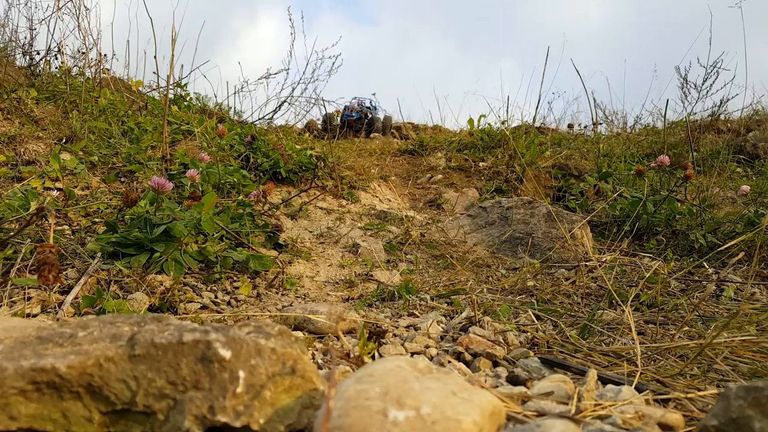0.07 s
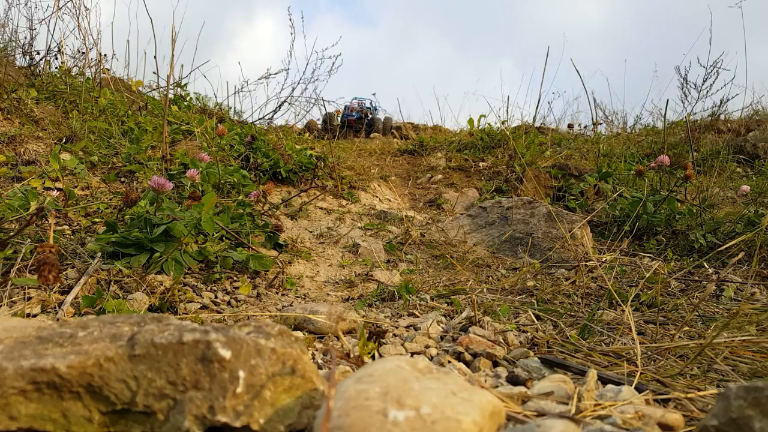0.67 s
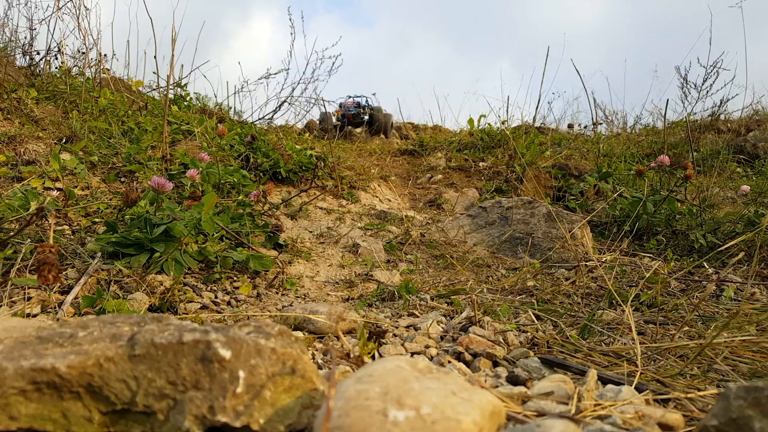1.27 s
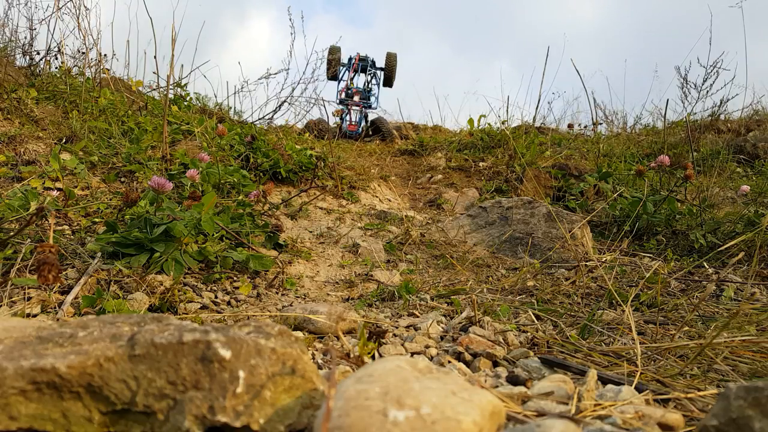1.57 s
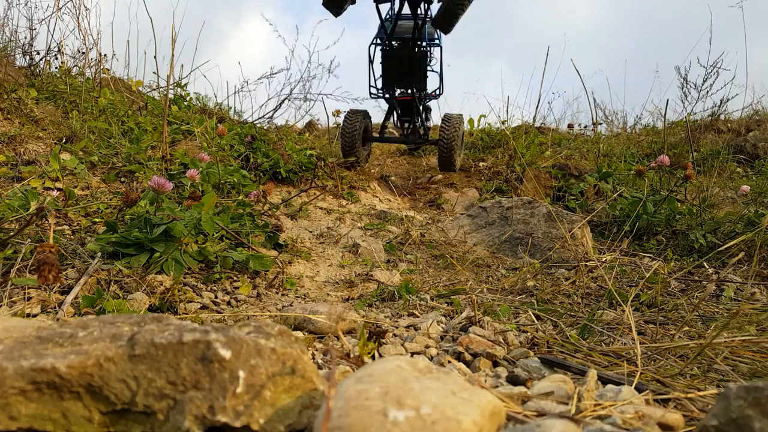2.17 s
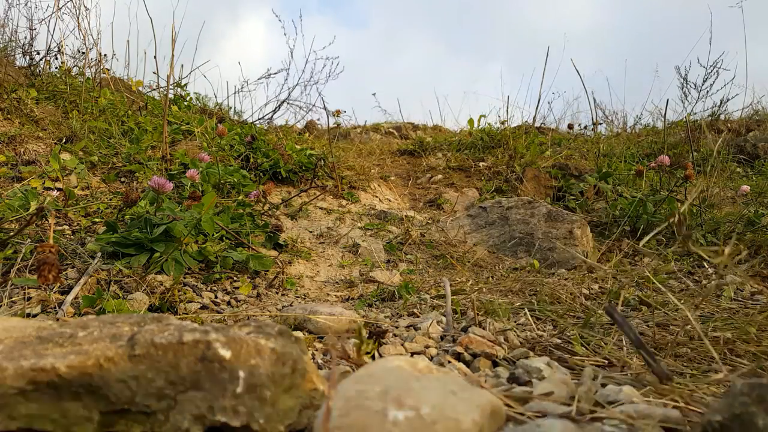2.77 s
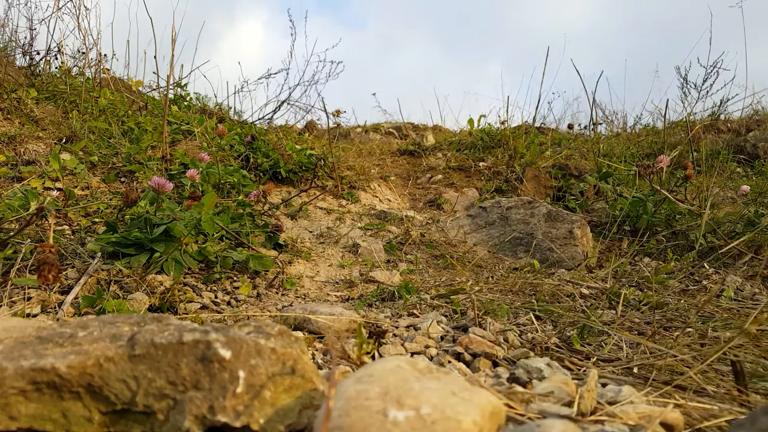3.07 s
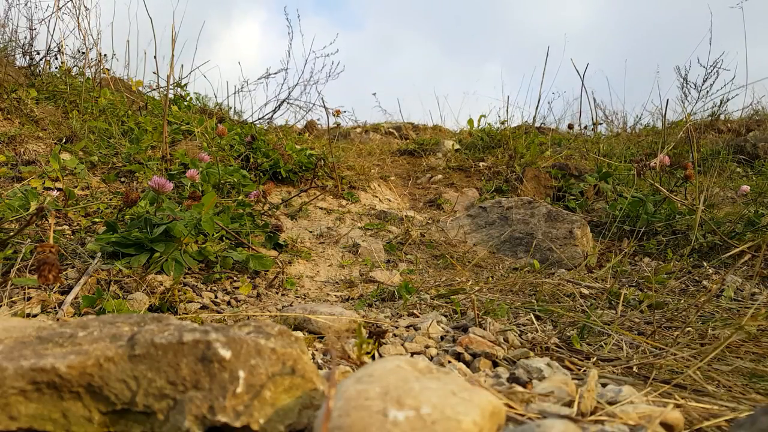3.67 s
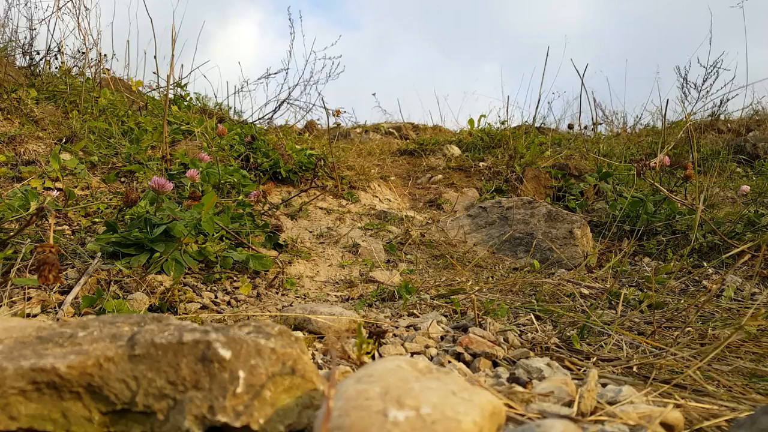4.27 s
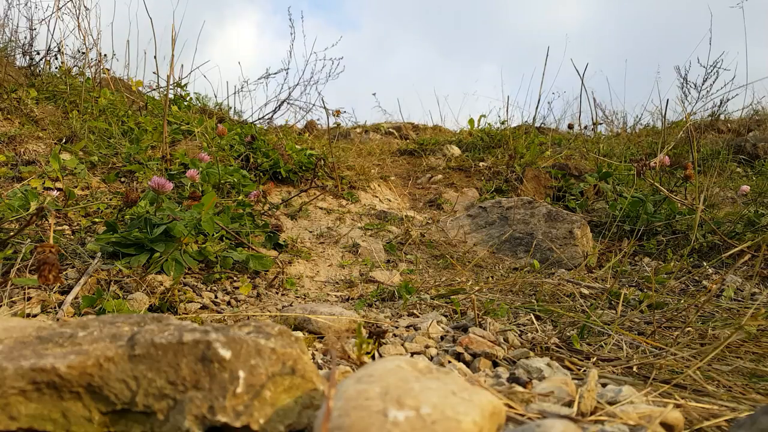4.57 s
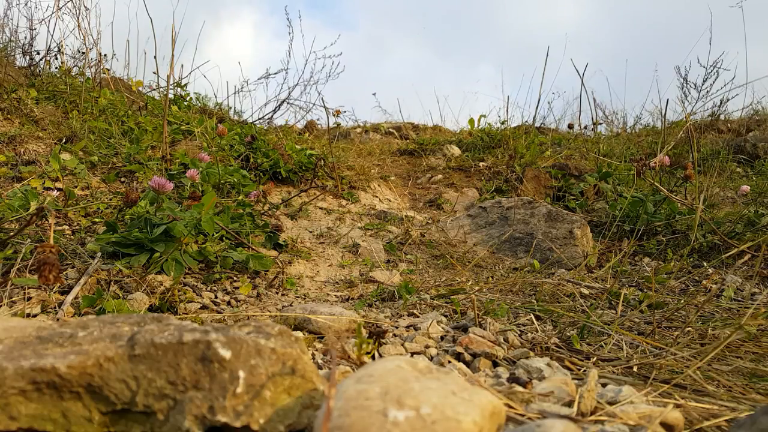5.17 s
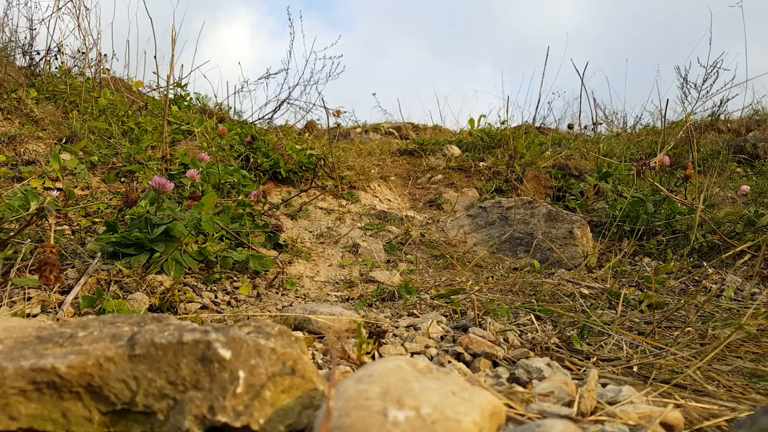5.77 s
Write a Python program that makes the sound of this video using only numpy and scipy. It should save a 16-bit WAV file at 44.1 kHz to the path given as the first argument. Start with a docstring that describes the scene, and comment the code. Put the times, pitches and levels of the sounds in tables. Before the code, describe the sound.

A radio-controlled car revs briefly, then tumbles down a gravelly bank with thumps, plastic clacks and scrapes, crashing close on the right.

```python
"""A far engine drones and grasshoppers rasp at the foot of a grassy bank; a distant bird peeps.
Up on the crest a radio-controlled car revs, gears whining and brushes hissing, then tumbles down
through gravel and dry straw. It passes just right of a stereo microphone on the ground and crashes
beside it, tyres thumping and plastic body clacking, with a hollow boom. Stalks and pebbles settle."""
import sys
import numpy as np
from scipy import signal
from scipy.fft import rfft, irfft, next_fast_len
from scipy.io import wavfile
from scipy.ndimage import uniform_filter1d, map_coordinates

SR = 44100
rng = np.random.default_rng(int(sys.argv[2]) if len(sys.argv) > 2 else 0)


def transcribe(signal):
    """Save signal, clipped to [-1, 1], as a 16-bit WAV file at the path in sys.argv[1]."""
    frames = np.atleast_2d(signal).T
    limited = np.clip(frames, -1, 1)
    pcm = np.round(limited * 32767).astype(np.int16)
    wavfile.write(sys.argv[1], SR, pcm)


N = 257103

# Levels in the tables are relative within each layer.
# spectra of the open air, far insects and a grasshopper's rasp: frequency_hz, gain_db
AIR_SPECTRUM = [(20, -23), (35, -3), (52, 2), (74, -3), (100, 4), (160, -1.5), (300, -8), (500, -15.5),
                (1000, -22), (2000, -31.5), (4000, -45), (7000, -48.5), (9000, -52.5), (16000, -45)]
INSECT_SPECTRUM = [(3800, -44), (4600, -19), (4850, -0.5), (5100, -31), (6000, -42), (8200, -8),
                   (9100, 1.5), (9900, -21), (12000, -45)]
RASP_SPECTRUM = [(6000, -62), (7500, -1), (8300, 14.5), (8800, 10.5), (9100, -6), (9600, 11), (10500, -61),
                 (14000, -38)]
# a deep hum: frequency_hz, gain_db; its swell: time_s, level_db
HUM_SPECTRUM = [(45, -54.5), (62, -4.0), (72, 9), (82, -1.5), (110, -41.5), (400, -101)]
HUM_SWELL = [(0, -49.5), (1.2, -44), (2.7, -44.5), (4, -54), (5.83, -48)]
# the far engine fading away: time_s, level_db
ENGINE_FADE = [(0, -39), (.44, -29.5), (.56, -42), (1.3, -41.5), (1.45, -52), (1.9, -49.5), (2.2, -87)]
# peeps of a far bird: start_s, level_db
BIRD_PEEPS = [(0.41, -72), (0.601, -75), (0.87, -74)]
# bouts of grasshopper song: start_s, length_s, level_db
SONG_BOUTS = [(0, 0.26, -55.5), (2.604, 6.9, -58.5), (5.08, 0.82, -60.5)]
# the waiting electronics' whistle: time_s, level_db
WHISTLE_FADE = [(0, -73), (.55, -73), (.8, -69), (.87, -85), (1, -120)]
# throttle squeezes: at_speed_s, length_s, mesh_hz, whine_db, hiss_db
THROTTLE_SQUEEZES = [(0.964, 0.013, 470, -40, -61), (1.138, 0.034, 1025, -44, -52),
                     (1.213, 0.056, 1180, -40, -51), (1.31, 0.009, 1125, -39, -47),
                     (1.425, 0.017, 440, -43, -66), (1.49, 0.02, 800, -54, -65),
                     (1.54, 0.06, 720, -62, -70)]
# gear overtones: mesh_multiple, level_db
GEAR_OVERTONES = [(1, -4.5), (2, 3.5), (3, -10.5), (4, -4.5), (6, -16), (8, -17)]
# what gearbox and brushes radiate: frequency_hz, gain_db
GEARBOX_RESPONSE = [(400, -8.5), (950, 1.5), (1250, -2.5), (1600, 2), (2000, -17), (2350, -6), (3200, 2.5),
                    (4200, -21), (6300, 4.5), (8500, -4)]
BRUSH_SPECTRUM = [(3000, -14), (6000, -11), (7500, 3), (8600, 10), (10000, -3.5), (16000, -27)]
# the car drags or loose ground slides: start_s, length_s, soil_db, gravel_db, straw_db
GROUND_DRAGS = [(0.06, 0.091, -43.5, -51, -64.5), (0.955, 0.052, -51, -51.5, -64),
                (1.13, 0.032, -37.5, -37.5, -57), (1.24, 0.097, -40.5, -42, -44.5),
                (1.44, 0.068, -35.5, -39.5, -54), (1.58, 0.078, -50.5, -50, -62),
                (1.765, 0.0086, -45, -37.5, -43), (1.92, 0.0094, -39, -29, -38.5),
                (1.98, 0.044, -41, -40.5, -48.5), (2.383, 0.0069, -33.5, -29, -63),
                (2.427, 0.012, -28, -23, -27), (2.49, 0.01, -37, -36.5, -47),
                (2.62, 0.07, -65, -52.5, -50.5), (2.768, 0.044, -25, -23.5, -27.5),
                (2.805, 0.015, -22.5, -23, -22.5), (2.87, 0.026, -64, -37.5, -44),
                (3.008, 0.012, -22, -19.5, -33), (3.068, 0.047, -30, -26, -31.5),
                (3.25, 0.065, -33, -35.5, -37.5), (3.735, 0.095, -28.5, -33.5, -58),
                (3.812, 0.017, -27, -24, -37), (3.965, 0.017, -28, -37, -48.5),
                (4.22, 0.37, -51, -56.5, -54), (4.66, 0.13, -53, -46.5, -46.5),
                (5.02, 0.055, -52, -47.5, -48), (5.48, 0.019, -69, -50, -42.5),
                (5.725, 0.063, -32, -35.5, -43)]
# a skid against its landing's thud, clack and crack: soil_db, gravel_db, straw_db
SKID_OFFSETS = [-16, -12, -13]
# spectra of the ground, tyres, plastic body and breaking stalks: frequency_hz, gain_db
SOIL_SPECTRUM = [(50, -37), (130, -1.5), (230, 2), (350, 0.5), (600, -3), (900, -15.5), (2000, -94.5)]
GRAVEL_SPECTRUM = [(300, -20), (700, 4), (1200, 4), (1900, -6), (2900, -7), (4200, -31.5), (8000, -55)]
STRAW_SPECTRUM = [(1500, -9), (3500, 5), (5500, -1.5), (8000, 1.5), (11000, 1), (16000, 0)]
THUD_SPECTRUM = [(40, -36.5), (115, -6.5), (160, -2.5), (260, 2.5), (350, -2), (480, -11.5), (650, -8.5),
                 (900, -50.5), (2000, -68)]
CLACK_SPECTRUM = [(300, -5), (700, 0.5), (1200, 2.5), (1600, -3), (1900, -2.5), (2300, -13), (2650, -2.5),
                  (3200, -10.5), (3800, -25), (6000, -35), (12000, -55)]
SNAP_SPECTRUM = [(200, -1), (900, 5.0), (2500, 1), (5500, 0.5), (9000, 5.5), (13000, 4.5), (16000, 6.5)]
# dry stalks break: start_s, level_db
STALK_SNAPS = [(1.7106, -39), (1.7187, -40), (1.742, -37.5), (1.785, -38), (1.829, -41), (1.919, -37),
               (2.375, -28), (2.3984, -42), (2.5441, -46), (3.0472, -15.5), (4.516, -22), (4.5676, -28.5),
               (4.656, -25), (4.6946, -42), (4.7337, -32.5), (4.7467, -28.5), (4.7652, -25.5), (5.08, -34),
               (5.4793, -35), (5.613, -24.5), (5.814, -35)]
# pebbles knock together: start_s, level_db, pitch_hz
PEBBLE_KNOCKS = [(0.266, -34, 676), (0.341, -33, 694), (.452, -35.5, 770), (1.175, -30.5, 1000),
                 (1.395, -30, 1190), (1.48, -40, 790), (1.761, -31.5, 1020), (2.115, -31.5, 1160),
                 (2.424, -19.5, 1220), (3.004, -15.5, 1440), (3.016, -16, 1830), (3.036, -22, 2700),
                 (3.092, -29, 1780), (3.12, -22, 2610), (3.227, -30.5, 2800), (3.26, -28.5, 1900),
                 (3.463, -28, 1750), (3.489, -37, 2000), (3.634, -22.5, 760), (4.056, -32, 990),
                 (4.095, -31.5, 1100), (4.535, -34.5, 1180), (4.636, -37.5, 1680), (5.003, -36, 840),
                 (5.031, -37.5, 1800), (5.101, -31.5, 970)]
# modes of a small steel part and of the hollow boom: pitch_hz, level_db, t60_s
STEEL_MODES = [(4170, 2, 0.015), (5500, -14, 0.022), (10700, 4, 0.012)]
BOOM_MODES = [(149.4, 2.5, 0.38), (228, 4.5, 0.28), (279, -6.5, 0.85), (313, -10.5, 1), (336, -8, 0.98),
              (448.2, -3, 0.19), (512, -18, 0.2), (557, -16, 1)]
# the car strikes the ground: start_s, thud_db, clack_db, crack_db, boom_share
LANDINGS = [(1.752, -34.5, -37.5, -41, 0.37), (1.911, -45, -40, -30.5, 0.2), (1.921, -51, -33.5, -53, 0.3),
            (1.972, -30.5, -37, -58, 0.28), (2.381, -27, -57, -50, 0), (2.419, -15.5, -25, -53, 0.06),
            (2.428, -17.5, -26, -47, 0.03), (2.813, -23, -14, -15, 0), (2.987, -27, -27, -46, 0),
            (3.003, -18, -23, -28.5, 0.26), (3.303, -12, -26.5, -41, 0.16), (3.318, -14.5, -42, -53, 0.31),
            (3.331, -18, -29.5, -37, 0), (3.536, -6.5, -18, -24, 0.73), (3.555, -5.5, -28, -50, 0.44),
            (3.566, -17, -21, -33, 0.46), (3.595, -18, -31, -40, 0.05), (3.63, -18, -32.5, -38.5, 0.42),
            (3.686, -12.5, -29, -42, 0.52), (3.716, -13.5, -20, -29, 0.12), (3.747, -18, -30, -30.5, 0.05),
            (3.815, -38, -27.5, -49, 0.5), (3.973, -33, -36, -55, 0.9), (4.14, -23.5, -37, -50, 0.32),
            (4.31, -34.5, -62, -65, 0.4), (5.531, -33.5, -59, -70, 0.2), (5.546, -33, -44, -65, 0.05),
            (5.561, -23.5, -38.5, -42.5, 0)]
# where the car, and the stalks and stones it disturbs, are heard from:
# time_s, bearing (0 ahead, 1 hard right)
BEARINGS = [(2.1, 0.04), (2.45, 0.29), (2.6, 0.39), (2.78, 1), (4.15, 0.74), (4.5, 0.29), (5.1, 0.066),
            (5.7, 0.8)]
# upper middle cancelled by the ground's reflection: time_s, cancelled_share
GROUND_DIP = [(1, 0.55), (2.1, 0.45), (2.45, 0.0036), (2.7, 0.051)]


def amp(db):
    return 10 ** (np.asarray(db) / 20)


def unit(x):
    return x / np.sqrt(np.mean(x ** 2) + 1e-20)


def noise():
    return rng.standard_normal(N)


def fade(t, t60):
    return np.exp(-np.log(1000) * t / t60)


def held(t, start, length, attack, release):
    """Attack, hold at 1, release; the edges are times for 60 dB."""
    return fade(np.maximum(start - t, 0), attack) * fade(np.maximum(t - start - length, 0), release)


def curves(rows):
    """One value per sample for each column after the time."""
    s, *cols = np.transpose(rows)
    return [np.interp(np.arange(N) / SR, s, c) for c in cols]


def wobble(rate):
    """A smooth random curve, rate knots a second."""
    return map_coordinates(rng.standard_normal(int(N * rate / SR) + 4), [np.arange(N) * rate / SR])


def colour(x, points, size=4096):
    """Causal filter of unit energy through (frequency_hz, gain_db) points."""
    hz, db = np.transpose(points)
    gain_db = np.interp(np.log(np.fft.rfftfreq(size, 1 / SR) + 1), np.log(hz), db)
    cepstrum = irfft(np.log(amp(gain_db)))
    cepstrum[1:size // 2] *= 2
    cepstrum[size // 2 + 1:] = 0
    impulse = irfft(np.exp(rfft(cepstrum)))
    impulse /= np.linalg.norm(impulse)
    return signal.fftconvolve(np.atleast_2d(x), impulse[None], axes=1)[:, :x.shape[-1]]


def add(track, s, sound):
    """Lay a sound into a track at s seconds."""
    part = track[..., max(round(s * SR), 0):][..., :sound.shape[-1]]
    part += sound[..., :part.shape[-1]]


def spread(draw, apart_db):
    """Two channels of rms 1: a shared signal plus each side's own."""
    return unit(draw() + amp(apart_db) * np.array([draw(), draw()]))


def open_air():
    """A far rumble over a deep hum; only the long waves reach both sides of the microphone alike."""
    short_waves = signal.sosfilt(signal.butter(1, 700, "high", fs=SR, output="sos"), [noise(), noise()])
    level = amp(-46.5 + 0.5 * wobble(3.24))
    rumble = level * colour(spread(noise, apart_db=-12) + 2.02 * short_waves, AIR_SPECTRUM)
    hum_db, = curves(HUM_SWELL)
    return rumble + amp(hum_db) * colour(noise(), HUM_SPECTRUM)


def far_engine(idle_hz=101.8, pull_away_s=0.32, climb_hz_per_s=25):
    """A distant engine idles, then gathers speed; moving air makes it waver, more so when faint."""
    db, = curves(ENGINE_FADE)
    hz = idle_hz + climb_hz_per_s * np.maximum(np.arange(N) / SR - pull_away_s, 0)
    waver = np.clip((db.max() - db) / 4, 1, 3.5) * wobble(24)
    phase = 2 * np.pi * np.cumsum(hz) / SR + 0.22 * waver + 0.46 * wobble(15.5)
    return amp(db + 1.5 + waver) * np.sin(phase)


def far_insects():
    """Insects far across the grass merge into a thin, steady shrill."""
    return amp(-74.5 + 1.5 * wobble(4.2)) * colour(spread(noise, apart_db=-1.5), INSECT_SPECTRUM)


def far_bird(pitch_hz=4450, sag_hz_per_s=2000, length_s=0.077):
    """Each peep is a thin note that sags in pitch."""
    out, t = np.zeros(N), np.arange(round(length_s * SR)) / SR
    peep = np.hanning(len(t)) * np.sin(2 * np.pi * np.cumsum(pitch_hz - sag_hz_per_s * t) / SR)
    for s, db in BIRD_PEEPS:
        add(out, s, amp(db) * peep)
    return out


def grasshopper(stroke_hz=18.5, quicken_hz_per_s=0.556, edge_s=0.19):
    """Left of the microphone, each leg stroke rasps out a soft chirp; the strokes slowly quicken."""
    t = np.arange(N) / SR
    bouts = sum(amp(db) * held(t, s, length, edge_s, edge_s) for s, length, db in SONG_BOUTS)
    cycles = np.cumsum(stroke_hz + quicken_hz_per_s * t) / SR - .08
    stroke = np.abs(np.sin(np.pi * cycles)) ** 3
    return bouts * stroke * colour(spread(noise, apart_db=1), RASP_SPECTRUM) * amp([[.5], [-6]])


def throttle(spin_up_s=0.045, coast_hz_per_s=7400, inertia_s=0.016):
    """Each squeeze spins the motor up, then it coasts down; the faster, the louder."""
    t = np.arange(N) / SR
    drive = np.zeros((3, N))
    for s, length, top_hz, whine_db, hiss_db in THROTTLE_SQUEEZES:
        rising = 1 + (t - s) / spin_up_s
        coasting = 1 - (t - s - length) * coast_hz_per_s / top_hz
        speed = np.clip(np.minimum(rising, coasting), 0, 1)
        whine, hiss = amp(whine_db) * speed ** 1.5, amp(hiss_db) * speed ** 3.2
        drive = np.maximum(drive, [top_hz * speed, whine, hiss])
    return uniform_filter1d(drive, round(inertia_s * SR), axis=1)


def motor(whistle_hz=5945):
    """On the crest the waiting electronics whistle; then gears whine and brushes hiss under throttle."""
    mesh_hz, whine, hiss = throttle()
    phase = 2 * np.pi * np.cumsum(mesh_hz * (1 + .014 * wobble(700))) / SR
    gears = np.zeros(N)
    for order, db in GEAR_OVERTONES:
        # backlash makes every overtone rattle in strength and phase
        rattle_db, slip = 3 * wobble(200), .35 * wobble(500)
        radiated_db = np.interp(order * mesh_hz, *np.transpose(GEARBOX_RESPONSE))
        gears += amp(db + radiated_db + rattle_db) * np.sin(order * phase + slip)
    sparks = unit(noise() * (1 + np.sin(phase)) * amp(3.4 * wobble(150)))
    whistle_db, = curves(WHISTLE_FADE)
    whistle = np.sin(2 * np.pi * whistle_hz * np.arange(N) / SR + .3 * wobble(120))
    return whine * gears + hiss * colour(sparks, BRUSH_SPECTRUM) + amp(whistle_db) * whistle


def crunch(rate_hz, size_db, smooth_db, apart_db):
    """Tiny fractures of uneven size over smooth sliding noise, in stereo."""
    def draw():
        sizes = amp(size_db * np.minimum(rng.exponential(size=N), 3)) * np.sign(noise())
        fractures = unit(sizes * (rng.random(N) < rate_hz / SR))
        return unit(fractures + amp(smooth_db) * noise())
    return spread(draw, apart_db)


def dragging(skid_delay_s=0.0089, skid_s=0.015, trickle_t60_s=0.98, trickle_db=(-38, -17.5, -14)):
    """Strength of soil, gravel and straw: each drag or skid swells, holds and leaves a trickle."""
    t = np.arange(0, N / SR, .001)
    skids = [(s + skid_delay_s, skid_s, *np.add(levels, SKID_OFFSETS)) for s, *levels, _ in LANDINGS]
    power = np.zeros((3, len(t)))
    for s, length, *levels_db in list(GROUND_DRAGS) + skids:
        attack_s, release_s = 0.031 + 3.57 * length, 0.083 + 3.3 * length  # longer drags are gentler
        contact = held(t, s, length, attack_s, release_s)
        trickle = np.outer(amp(trickle_db), held(t, s, length, attack_s, trickle_t60_s))
        power += (amp(levels_db)[:, None] * np.maximum(contact, trickle)) ** 2
    return curves(np.column_stack([t, *np.sqrt(power)]))


def scrape():
    """Tyres drum on soil, grind gravel and tear through straw."""
    on_soil, on_gravel, on_straw = dragging()
    soil = colour(crunch(rate_hz=400, size_db=5.5, smooth_db=-5.5, apart_db=-18.5), SOIL_SPECTRUM)
    gravel = colour(crunch(rate_hz=600, size_db=3.5, smooth_db=-12.5, apart_db=-6), GRAVEL_SPECTRUM)
    rustle = crunch(rate_hz=3000, size_db=6.5, smooth_db=-3, apart_db=4)
    # stalks give way in clumps, so the rustle swells and sinks within milliseconds
    straw = colour(unit(rustle * amp(3.4 * wobble(220))), STRAW_SPECTRUM)
    return amp(-1) * on_soil * soil + amp(-4) * on_gravel * gravel + amp(-1) * on_straw * straw


def stalks():
    """A dry stalk breaks with a sharp crack and a brief splintering."""
    out, t = np.zeros((2, N)), np.arange(SR // 10) / SR
    for s, db in STALK_SNAPS:
        crack = rng.standard_normal(len(t)) * fade(t, 0.014)
        splinters = 0.47 * rng.standard_normal((2, len(t))) * fade(t, 0.016)
        add(out, s, amp(db + 1) * (crack + splinters))
    return colour(out, SNAP_SPECTRUM)


def pebbles():
    """A knocked stone gives a dry tick, broad around its own pitch, with hardly any ring."""
    out, t = np.zeros(N), np.arange(SR // 20) / SR
    for s, db, hz in PEBBLE_KNOCKS:
        contact = 0.25 * rng.standard_normal(len(t)) * fade(t, 0.019)
        contact[0] += 2
        body = signal.butter(2, [hz * 0.53, hz * 1.12], "band", fs=SR, output="sos")
        knock = signal.sosfilt(body, contact) + 0.0079 * contact
        add(out, s, 6 * amp(db + 5) * knock / np.linalg.norm(knock))
    return out


def steel_clink(start_s=3.157):
    """A small steel part of the chassis catches a stone."""
    out, t = np.zeros(N), np.arange(SR // 10) / SR
    ring = sum(amp(db) * np.sin(2 * np.pi * hz * t) * fade(t, t60) for hz, db, t60 in STEEL_MODES)
    add(out, start_s, amp(-19) * ring)
    return out


def landings():
    """Each landing thumps the tyres, clacks the plastic body, crushes grit and may boom hollowly."""
    t = np.arange(SR) / SR
    thud, clack, crack, boom = np.zeros((4, N))
    swell = 1 - np.exp(-t / 0.0061)
    for s, thud_db, clack_db, crack_db, boom_share in LANDINGS:
        push, rattle, grit = rng.standard_normal((3, len(t)))
        push = 0.7 * push * fade(t, 0.054)
        push[0] += 12  # one hard shove at first contact; the suspension shudders after it
        add(thud, s, amp(thud_db) * push)
        add(clack, s, amp(clack_db + 2.5) * rattle * fade(t, 0.041))
        add(crack, s, amp(crack_db + 1) * grit * fade(t, 0.015))
        for hz, db, t60 in BOOM_MODES:
            # a fresh blow feeds the swing that is already going
            mode = np.sin(2 * np.pi * hz * (s + t) + rng.normal(0, 0.87))
            level = boom_share * amp(thud_db + db - 7.5 + rng.normal(0, 0.63))
            add(boom, s, level * mode * swell * fade(t, t60))
    strikes = colour(thud, THUD_SPECTRUM) + colour(clack, CLACK_SPECTRUM) + colour(crack, STRAW_SPECTRUM)
    return strikes + boom


def at_microphone(sound, side_delay_s=0.00039):
    """Far up, ground reflection cancels the upper middle; to the right, the left side lags and dulls."""
    bearing, = curves(BEARINGS)
    dip, = curves(GROUND_DIP)
    upper_middle = signal.sosfiltfilt(signal.butter(2, [2250, 4400], "band", fs=SR, output="sos"), sound)
    left, right = sound - dip * upper_middle
    dull = signal.sosfilt(signal.butter(1, 900, fs=SR, output="sos"), left)
    shade = 0.77 * bearing ** 1.05
    left = (1 - shade) * left + shade * dull
    left = map_coordinates(left, [np.arange(N) - bearing * side_delay_s * SR])
    return np.array([left, right])


def bank_echo(sound, t60_s=0.034):
    """Stones and slope scatter a short, weak answer."""
    t = np.arange(SR // 5) / SR
    tail = rng.standard_normal((2, len(t))) * fade(t, t60_s) * (1 - np.exp(-t / 0.00022))
    echo = signal.fftconvolve(sound, tail / np.linalg.norm(tail[0]), axes=1)[:, :N]
    return amp(-6) * signal.sosfilt(signal.butter(1, 500, "high", fs=SR, output="sos"), echo)


def scene():
    """The tumbling car and the meadow around it, heard from the foot of the bank."""
    near = at_microphone(scrape() + landings() + pebbles() + stalks() + steel_clink() + motor())
    return near + bank_echo(near) + grasshopper() + far_insects() + far_bird() + far_engine() + open_air()


def record(dry):
    """The recorder rounds off the highest peaks and keeps nothing above its band limit."""
    rounded = dry / (1 + np.abs(dry) ** 6) ** (1 / 6)
    size = next_fast_len(N + SR // 2)
    in_band = np.fft.rfftfreq(size, 1 / SR) < 16100
    return irfft(rfft(rounded, size) * in_band, size)[:, :N]


dry = scene()
out = record(dry)
transcribe(out)
```